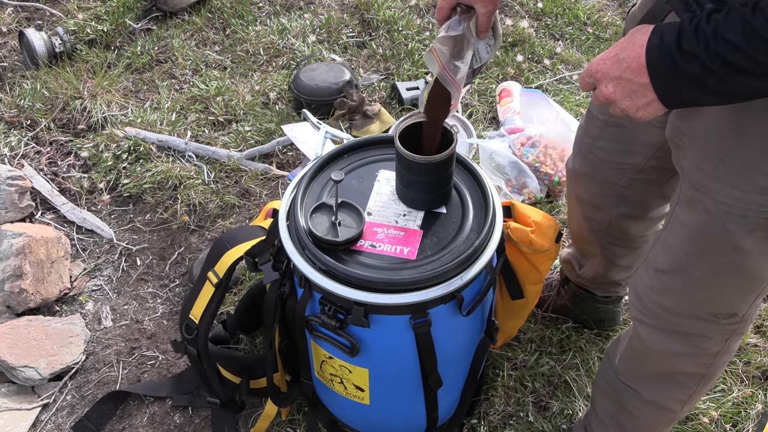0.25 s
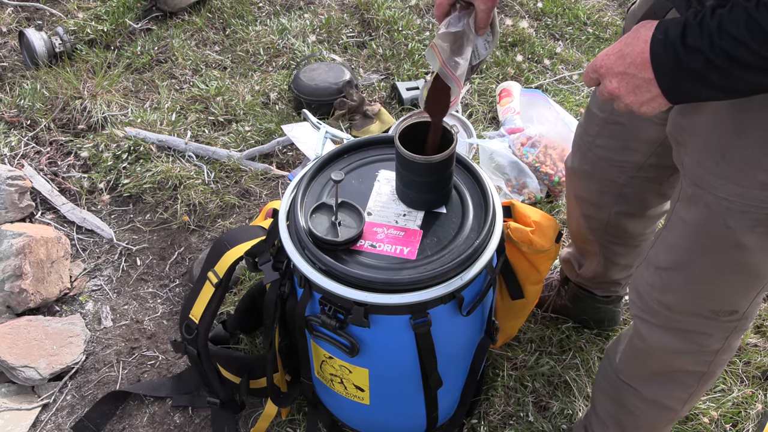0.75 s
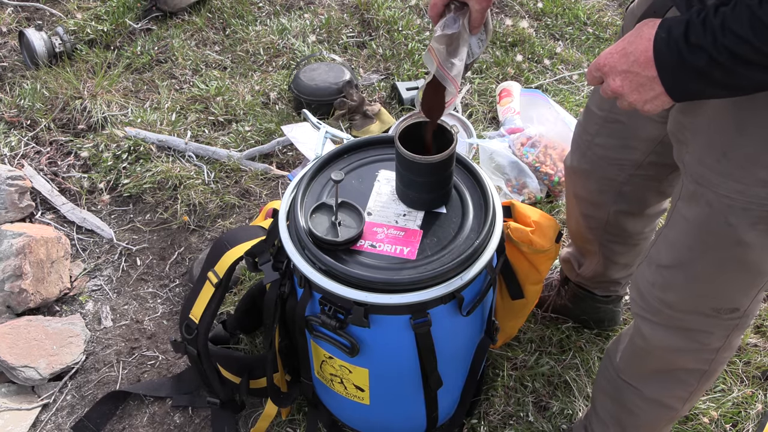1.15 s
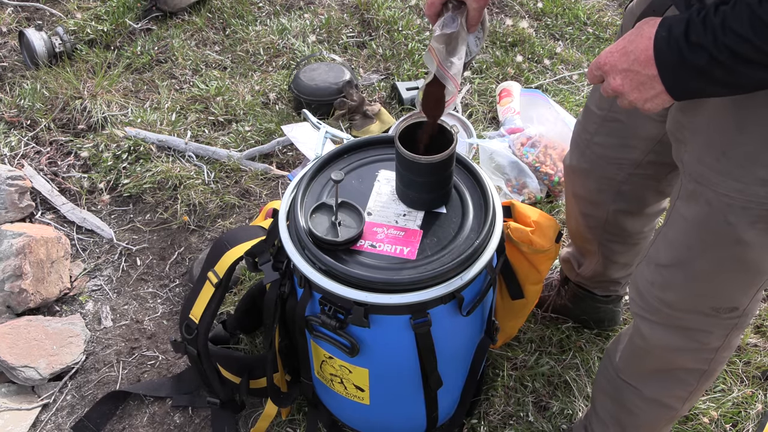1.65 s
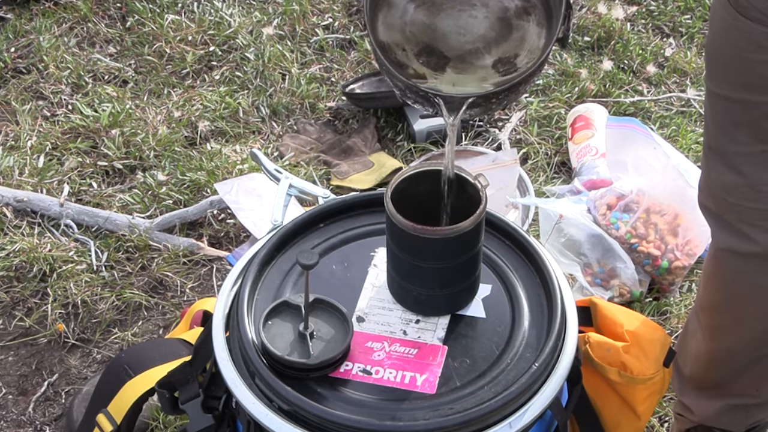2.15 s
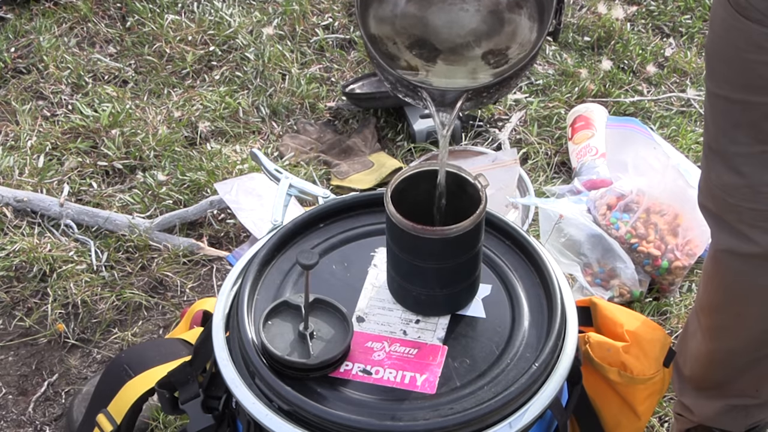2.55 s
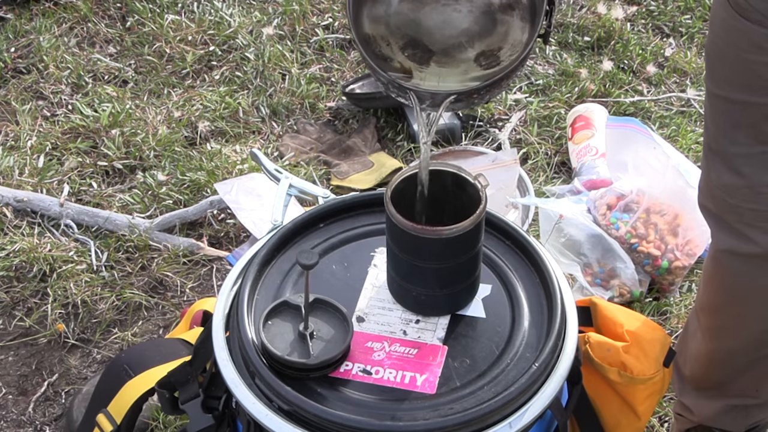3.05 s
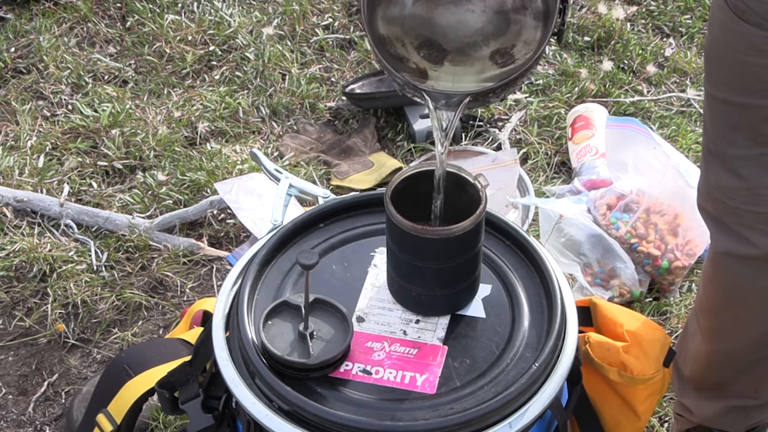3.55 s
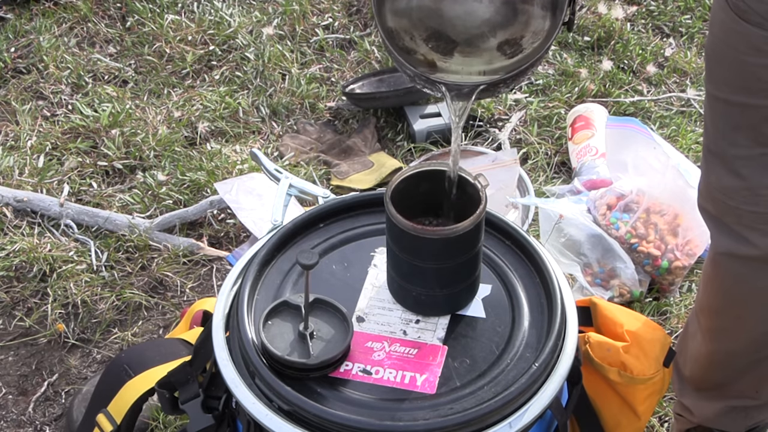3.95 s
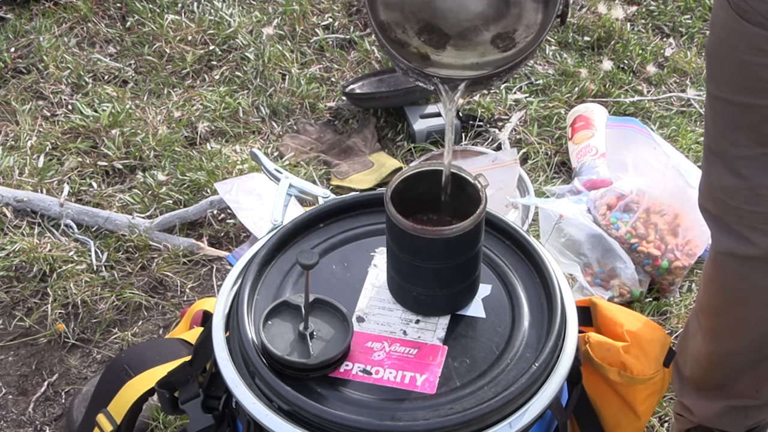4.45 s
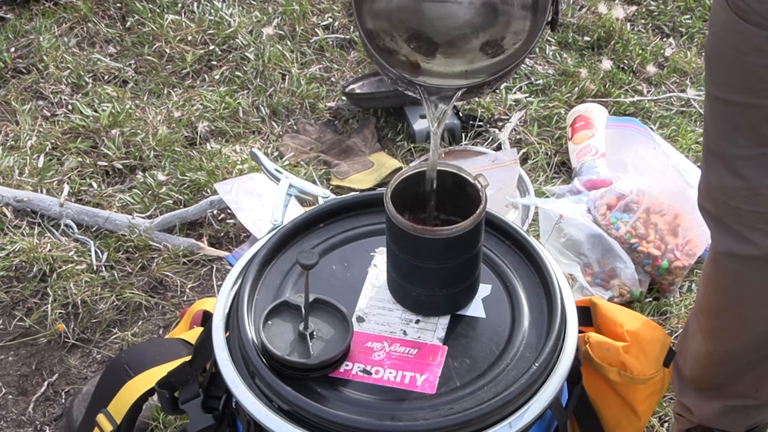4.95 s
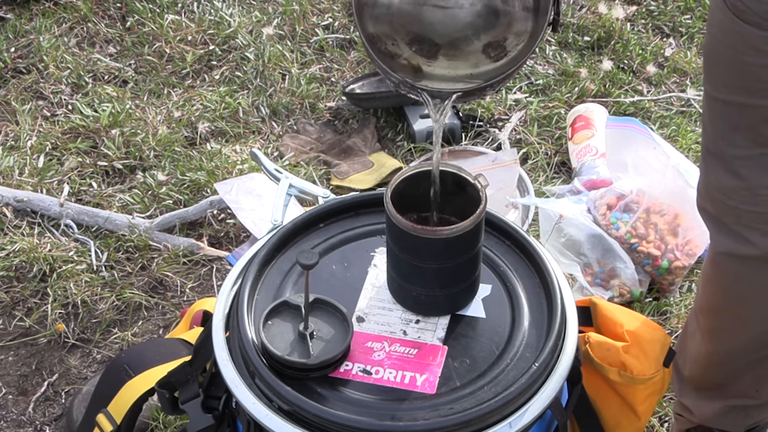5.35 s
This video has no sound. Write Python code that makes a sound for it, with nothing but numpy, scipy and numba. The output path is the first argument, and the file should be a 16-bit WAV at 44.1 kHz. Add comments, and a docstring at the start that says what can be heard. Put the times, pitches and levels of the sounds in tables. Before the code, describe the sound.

Tiny bag and spoon ticks over a soft river rush and low gusts; then sharp, dry metallic knocks, a close pair and a single one, with a weaker knock just before the pour. Hot water then streams into a tall mug, crisp, fizzy and uneven, with small slaps ringing the wall and air inside. The splashes surge strongly late on. Close two-channel microphone in open air, leaning left, with little reverberation.

```python
"""A stream of hot water pours into a tall metal mug: bursts of noise and tiny bubbles make its spatter and spray,
while the same water rings the mug's wall and the air inside. Just before it lands, four knocks on the mug
sound as short pushes, rattles and ringing modes; faint ticks of handling lie around them. A river rushes
further off as noise in many bands, and wind rumbles low on a two-port microphone whose right port is thin
in the bass and of opposite sign."""
import sys
import numpy as np
from scipy import signal
from scipy.fft import rfft, irfft
from scipy.io import wavfile
from scipy.ndimage import uniform_filter1d
from numba import njit

SR = 44100
rng = np.random.default_rng(int(sys.argv[2]) if len(sys.argv) > 2 else 0)


def put_to_file(sound):
    """Save the sound as 16-bit audio at rate SR, in the file named by the first command-line argument."""
    columns = np.atleast_2d(sound).T  # one column per channel
    safe = np.clip(columns, -1, 1)
    whole_steps = np.round(safe * 32767)
    wavfile.write(sys.argv[1], SR, whole_steps.astype(np.int16))


N = 246959  # length in samples
# Levels in the tables apply before the sound is shared between left and right and enters the microphone.


def undb(db):
    """Turn decibels into a plain gain."""
    return 10 ** (np.asarray(db) / 20)


def unit(x):
    """Scale a sound to rms 1."""
    return x / np.sqrt(np.mean(x ** 2))


def peak(x, db):
    """Scale a sound so that its highest peak is at this level."""
    return x * undb(db) / np.max(np.abs(x))


def curves(table, before_db=None):
    """Draw straight lines between a table's rows, one curve per column after the time."""
    s, *columns = np.transpose(table)
    return [np.interp(np.arange(N) / SR, s, c, left=before_db) for c in columns]


@njit
def sweep(x, hz, width):
    """State-variable band-pass with moving centre and width, gain 1 at the centre."""
    y, low_state, band_state = np.empty(len(x)), 0., 0.
    for i in range(len(x)):
        g, k = np.tan(np.pi * hz[i] / SR), width[i] / hz[i]
        v = (band_state + g * (x[i] - low_state)) / (1 + g * (g + k))
        band_state = 2 * v - band_state
        low_state += 2 * g * v
        y[i] = k * v
    return y


def band(x, hz, width_hz):
    """Keep the sound around one frequency, like a resonance that may move."""
    if np.ndim(hz):
        return sweep(x + 1e-18, hz, np.abs(width_hz + 0 * hz) + 1)
    # a centre that stands still needs only a plain two-pole filter
    hz = np.clip(hz, 20, .45 * SR)
    g = np.tan(np.pi * hz / SR)
    kg = g * abs(width_hz) / hz
    return signal.lfilter([kg, 0, -kg], [1 + kg + g * g, 2 * (g * g - 1), 1 - kg + g * g], x)


def twice(x, hz, width_hz):
    """The same band-pass run two times, for steeper sides."""
    return band(band(x, hz, width_hz), hz, width_hz)


def walk(rate):
    """A random level that takes a new value `rate` times a second, smoothed twice; spread near 1."""
    k = int(SR / rate)
    steps = np.repeat(rng.standard_normal(N // k + 1), k)
    return 1.43 * uniform_filter1d(uniform_filter1d(steps, k), k)[:N]


def crackle(rate, spread_db, smear_s):
    """Noise in short dying bursts of very uneven size; rms 1."""
    sizes = undb(spread_db * rng.exponential(size=N).clip(0, 4))
    hits = (rng.random(N) < rate / SR) * sizes
    tail = np.exp(-1 / (smear_s * SR))
    return unit(signal.lfilter([1], [1, -tail], hits) * rng.standard_normal(N))


def burst(t60, rise_s, size):
    """A noise that swells quickly and dies away by 60 dB in t60 seconds."""
    t = np.arange(size) / SR
    decay = np.exp(-np.log(1000) * t / max(t60, .001))
    return rng.standard_normal(size) * decay * np.minimum(t / max(rise_s, 1e-5), 1) ** 2


@njit
def ring_all(start, hz, cycles, size, glide, n):
    """Add up bubbles, each a dying sine whose pitch rises as it fades."""
    out = np.zeros(n)
    for k in range(len(start)):
        life = int(cycles[k] * SR / hz[k])
        phase = 0.
        for i in range(min(5 * life, n - start[k])):
            phase += 2 * np.pi * hz[k] * (1 + glide * i / life) / SR
            out[start[k] + i] += size[k] * np.exp(-i / life) * np.sin(phase)
    return out


def droplets(count, hz, octaves, cycles, spread_db, glide, clump):
    """Tiny bubbles in clumps, each ringing at its own pitch; rms 1."""
    place, loud = rng.random((count, 2)).T
    pitch, long = rng.standard_normal((count, 2)).T
    start = (place * N).astype(np.int64)
    size = undb(-spread_db * np.log(loud.clip(.02, 1)) + clump * walk(60)[start])
    bubble_hz = (hz * 2 ** (octaves * pitch)).clip(300, 14000)
    return unit(ring_all(start, bubble_hz, cycles * 2 ** (.5 * long), size, glide, N))


def ports(x, pan_db, lag_ms):
    """Share a sound between two ports: left minus right level, and how late the left one hears it."""
    turn = np.exp(-1j * np.pi * np.fft.rfftfreq(len(x), 1 / SR) * lag_ms / 1000)
    f = rfft(x)
    left = irfft(f * turn, len(x)) * undb(pan_db / 2)
    right = irfft(f / turn, len(x)) * undb(-pan_db / 2)
    return np.array([left, right])


def add(out, s, x):
    """Mix a short sound in at time s."""
    i = int(s * SR)
    n = min(x.shape[-1], N - i)
    out[..., i:i + n] += x[..., :n]


# Tone colour of the river. Each row: frequency in Hz, relative level in dB per Hz.
RIVER_COLOUR = [(59, -30), (100, 0), (143, -23), (206, -6.5), (283, -10.5), (535, 1.5), (608, 0.5),
                (1100, -2), (1870, -6), (2080, -7.5), (2580, -12.5), (3150, -16.5), (3700, -23),
                (5770, -25), (13200, -33.5), (16000, -34)]
RIVER_DB = -45  # average level before its slow swell


def river():
    """Bands of rushing noise flicker separately; the ports hear more alike in the bass than in the treble."""
    out, (hz_at, db_at) = 0, np.transpose(RIVER_COLOUR)
    for hz in 100 * 2 ** np.arange(0, 7.4, 1 / 3):  # third-octave steps
        mid, side = (twice(rng.standard_normal(N), hz, hz / 3) for _ in range(2))
        db = np.interp(np.log(hz), np.log(hz_at), db_at) + 1.0 * walk(7.5)
        apart = np.clip(hz / 3500, .4, 1)
        out = out + undb(db) * (mid + apart * side * np.array([[1], [-1]]))
    pan_db = np.array([[-1.5], [1.5]])
    return unit(out) * undb(RIVER_DB + 0.84 * walk(1.26) + pan_db)


# Gusts of wind. Each row: time in seconds, rumble level in dB before a small random wavering.
GUSTS = [(0.0, -57.5), (0.5, -46), (0.6, -49), (0.95, -48.5), (1.4, -60), (1.52, -54.5), (1.65, -57.5),
         (2.9, -50.5), (3.0, -58), (3.8, -57), (4.2, -55.5), (4.33, -59), (4.66, -48.5), (4.78, -57),
         (5.13, -54), (5.6, -63)]
FLUTTER_DB = -62.5  # higher flutter, around which its level wavers


def wind():
    """Gusts press on both ports, mostly shared, as a low rumble and a slightly higher flutter."""
    rumble_db, = curves(GUSTS)
    gust = rng.standard_normal(N) + .5 * rng.standard_normal((2, N))
    rumble = np.array([unit(band(band(g, 63, 67), 69, 99)) for g in gust])
    flutter = np.array([unit(band(band(g, 139.5, 50), 139, 82)) for g in gust])
    flutter_db = FLUTTER_DB + 1.14 * walk(3.05)
    return undb(1.2 * walk(6.2)) * (undb(rumble_db) * rumble + undb(flutter_db) * flutter)


# Small ticks of handling. Each row: start in seconds, peak in dB, centre in Hz,
# level of the lower body in dB relative to that peak.
HANDLING = [(0.094, -42.5, 2040, -5), (0.3203, -43, 2050, -6), (0.415, -34, 4700, -25),
            (0.5121, -29.5, 2920, -35), (0.5464, -30.5, 2650, -2), (1.5005, -39.5, 1940, -20),
            (1.562, -44, 2940, 6), (1.6907, -49, 1910, 16.5), (1.741, -47.5, 2140, 8.5),
            (1.8716, -41.5, 2080, 13.5), (1.92, -38.5, 2140, -3)]


def ticks():
    """Bag and spoon crackle faintly: a short noise in a bright band and a lower one."""
    out = np.zeros(N)
    for s, db, hz, body_db in HANDLING:
        tick = burst(0.016, 0.00017, size=1024)
        bright = peak(band(tick, hz, 0.28 * hz), db)
        body = peak(band(tick, 820, 600), db + body_db)
        add(out, s, bright + body)
    return ports(out, 7.0, .1)


# Knocks on the mug. Each row: start in seconds, peak of the main layer in dB, thud in dB relative to it,
# treble in dB relative to it, rattle's 60 dB decay in seconds, left minus right level in dB,
# rattle in dB relative to the push, contact time scale in milliseconds.
KNOCK_HITS = [(0.9527, -2.5, -2.5, -51, 0.027, 2, -5, 0.042), (0.9844, -3, -5, -12, 0.028, 5.5, -13, 0.063),
              (1.2698, -2.5, -12, -4, 0.013, -5, 0.5, 0.04),
              (1.8486, -16.5, -1.3, -42, 0.014, 0.5, 1, 0.14)]
# Echoes from the ground and the packs. Each row: delay in seconds, level in dB.
ECHOES = [(.0065, -14), (0.0151, -23), (0.033, -28)]
# Ringing modes of the lid. Each row: frequency in Hz, decay setting in seconds (longer makes a narrower band),
# level in dB before the modes are mixed with the thud and crack.
LID_MODES = [(240, 0.021, 8.5), (677, 0.032, 3.5), (1100, 0.008, 7), (1560, 0.013, -7.5), (2060, 0.02, -2),
             (4220, 0.014, -0.5), (5900, 0.0025, 8.5)]
KNOCK_LAG_MS = 0.11  # the left port hears the direct knocks this late


def knocks():
    """A hard push on the lid, a rattle of metal, the lid's short modes, then echoes from close by."""
    out, t = np.zeros((2, N)), np.arange(8192) / SR
    for s, db, thud_db, treble_db, t60, pan_db, rattle_db, contact_ms in KNOCK_HITS:
        push = -np.exp(-((t - .0003) * 1000 / contact_ms) ** 2)
        rattle = burst(t60, 0.00044, size=len(t))
        rattle = rattle + undb(-30.5) * burst(9.1 * t60, 0.00077, size=len(t))  # faint long tail
        metal = peak(band(twice(rattle, 3860, 5400), 3740, 5700), rattle_db)
        crack = peak(band(push, 3800, 9800), 0) + metal
        struck = push + 0.36 * rattle
        modes = [undb(g) * peak(band(struck, f, 3.3 / decay), 0) for f, decay, g in LID_MODES]
        # the three lowest modes join the thud, the others the crack
        thud = peak(band(push, 310, 1500), 0) + .5 * sum(modes[:3])
        treble = twice(push + 1.0 * rattle, 8070, 8200)
        hit = peak(thud, db + thud_db) + peak(crack + 0.26 * sum(modes[3:]), db)
        hit = hit + peak(treble, db + treble_db)
        add(out, s, ports(hit, pan_db, KNOCK_LAG_MS))
        # the metal's finest rattle reaches each port by its own paths
        jingle = [twice(burst(t60, 0.00059, size=len(t)), 8700, 6300) for _ in range(2)]
        add(out, s, peak(np.array(jingle), db + 1.15 * treble_db - 0.5))
        for (delay, g), side in zip(ECHOES, (-1, 1, -1)):
            echo = ports(band(hit, 3500, 14000), 1.5, .1 + 0.069 * side)
            add(out, s + delay, undb(g) * echo)
    return out


# Strength of the stream. Each row: time in seconds, spray level in dB.
STREAM = [(1.6, -63), (2.0, -59), (2.2, -59), (2.45, -61), (2.64, -54), (2.8, -58), (3.3, -63),
          (3.6, -61.5), (3.89, -67.5), (4.38, -58), (4.72, -60.5), (4.8, -52), (5.0, -54.5), (5.1, -64),
          (5.6, -63)]
LANDING_S = 1.95  # from here on lesser spatters may fall and the mug murmurs


def spray_level():
    """The spray's level in dB at every sample, silent before the stream."""
    return curves(STREAM, before_db=-120)[0]


# Loud spatters of the stream. Each row: start in seconds, peak of the body in dB, centre in Hz,
# fizz in dB relative to that peak.
LOUD_SPATTERS = [(2.0242, -37, 6010, -22), (2.0348, -35, 3350, -27), (2.0547, -36, 3330, -25),
                 (2.0734, -32, 3400, -29), (2.093, -34, 3380, -15), (2.1141, -23.5, 5420, -28),
                 (2.1355, -37, 5350, -18), (2.166, -39, 5210, -24), (2.1994, -40, 3100, -28),
                 (2.207, -37, 3050, -29), (2.2223, -35, 3080, -29), (2.2284, -33.5, 2960, -18),
                 (2.2415, -25, 6360, -11), (2.2812, -30, 6210, -25), (2.3006, -37.5, 4900, -25),
                 (2.3555, -31.5, 7110, -21), (2.376, -34.5, 6140, -19), (2.3894, -36, 7160, -16),
                 (2.4244, -36.5, 7040, -22), (2.4878, -38.5, 5200, -21), (2.539, -29.5, 5200, -29),
                 (2.5584, -39, 5300, -24), (2.5883, -35, 5490, -18), (2.602, -38, 3070, -23),
                 (2.6025, -31, 3350, -15), (2.6314, -38, 3230, -18), (2.6498, -39, 3210, -23),
                 (2.6579, -37, 3170, -22), (2.6798, -34, 3260, -25), (2.691, -36, 5210, -18),
                 (2.712, -32, 4740, -28), (2.7614, -37, 3050, -26), (2.7764, -35.5, 3330, -15),
                 (2.8593, -34, 4350, -12), (2.9378, -40, 3040, -18), (2.967, -35, 3390, -22),
                 (2.9814, -39, 3220, -21), (3.0736, -37.5, 3350, -20), (3.1232, -30.5, 3380, -26),
                 (3.1802, -34, 5990, -14), (3.224, -39, 3360, -19), (3.247, -44, 3370, -19),
                 (3.262, -39, 5020, -22), (3.28, -38.5, 3250, -21), (3.4183, -37, 3270, -24),
                 (3.46, -29.5, 6930, -20), (3.5458, -39.5, 3600, -15), (3.573, -34, 6150, -20),
                 (3.5824, -33, 6940, -25), (3.621, -33, 4280, -22), (3.6476, -36, 3450, -18),
                 (3.8828, -40, 5720, -26), (3.9906, -36.5, 7920, -25), (4.0138, -46, 3110, -19),
                 (4.063, -40.5, 4710, -15), (4.1077, -26.5, 4860, -23), (4.1177, -34, 4690, -20),
                 (4.1618, -35.5, 5080, -26), (4.2235, -40.5, 2940, -19), (4.3054, -41, 4580, -9),
                 (4.338, -23.5, 3320, -26), (4.377, -39, 3170, -8), (4.3939, -27, 3270, -23),
                 (4.404, -34, 3140, -17), (4.4995, -39, 5260, -19), (4.5408, -32, 3240, -8),
                 (4.59, -18, 5200, -15), (4.5984, -36, 3000, -14), (4.6384, -30.5, 3300, -36),
                 (4.6887, -41, 2900, -19), (4.7276, -34, 5200, 1), (4.76, -25, 3340, -21),
                 (4.7843, -31, 3120, -14), (4.7925, -28, 2980, 7), (4.8239, -24.5, 5630, -28),
                 (4.835, -29, 6130, -20), (4.8414, -24, 5810, -29), (4.8589, -15.5, 4400, -39),
                 (4.8782, -27, 4600, -29), (4.8842, -30, 2900, -24), (4.9028, -29.5, 5300, -18),
                 (4.9329, -22, 3460, -28), (4.9504, -26.5, 5350, -23), (4.9653, -26.5, 5390, -18),
                 (4.9724, -32, 4630, -16), (4.9957, -26.5, 4100, -3), (5.0017, -28, 3140, -17),
                 (5.0454, -32, 4100, -28), (5.0624, -36, 3000, -18), (5.094, -39.5, 6000, -4),
                 (5.1157, -35, 7520, 7), (5.154, -40, 2910, 8), (5.1955, -38.5, 3300, -15),
                 (5.2835, -28, 5950, -29), (5.3637, -33, 6570, -27), (5.425, -44, 3020, -12),
                 (5.507, -33, 5930, -24), (5.5356, -41, 3190, -12), (5.5744, -36.5, 7410, -18)]
SPATTER_T60_S, EDGE_DB = 0.0099, -2  # middle decay; broad bright edge relative to the body
THROWN_DB, THROWN_S = -17, 0.0047  # spray thrown up, relative to the body, and its fading time
# lesser spatters: least level relative to the spray, its spread, middle pitch and fizz
SMALL_DB, SMALL_SPREAD_DB, SMALL_HZ, SMALL_OCTAVES, SMALL_FIZZ_DB = 16.5, 2, 4900, 0.83, -12


def lesser_spatters(spray_db, count):
    """Choose random small spatters that follow the strength of the spray."""
    when, size, pitch, top = rng.random((count, 4)).T
    when = LANDING_S + when * ((N - 1) / SR - LANDING_S)
    db = spray_db[(when * SR).astype(int)] + SMALL_DB - SMALL_SPREAD_DB * np.log(size.clip(.05, 1))
    hz = SMALL_HZ * 2 ** (SMALL_OCTAVES * (2 * pitch - 1))
    return zip(when, db, hz, SMALL_FIZZ_DB + 16 * (top - .5))


def spatters(spray_db):
    """Water strikes in short bursts and throws up spray; returns the bursts and the gain of that spray."""
    splash, thrown = np.zeros((2, N))
    t = np.arange(2048) / SR
    for s, db, hz, fizz_db in [*LOUD_SPATTERS, *lesser_spatters(spray_db, count=95)]:
        drop = burst(SPATTER_T60_S * 2 ** rng.uniform(-1.0, 0.52), 0.0022, size=768)
        drop[60] += 2.2  # the impact itself is one sharp tick
        # big low bubbles ring a clearer pitch than small high ones
        body = peak(twice(drop, hz, hz * hz / 6500), db)
        edge = peak(twice(drop, 6670, 5000), db + EDGE_DB)
        fizz = peak(twice(drop, 8400, 7500), db + fizz_db)
        add(splash, s, body + edge + fizz)
        add(thrown, s, undb(db + THROWN_DB) * np.exp(-t / THROWN_S))
    return splash, thrown


# A high mode of the mug that the spray rings: frequency in Hz, width in Hz,
# level in dB at landing, around which it wavers before fading.
HIGH_MODE = (5380, 220, 1.65)
HIGH_MODE_FADE_DB_PER_S = 3.5  # the rising water damps it
FIZZ_DB = -13  # relative to the spray


def spray():
    """Fine bubbles ring a high mode of the mug, under a very high crackling fizz."""
    hz, width_hz, level_db = HIGH_MODE
    bubbles = droplets(count=14000, hz=5930, octaves=0.37, cycles=1.6, spread_db=3.5, glide=0.035, clump=3.7)
    fizz = unit(twice(crackle(900, 1.9, 0.005), 14200, 5300))
    fade_db = HIGH_MODE_FADE_DB_PER_S * (np.arange(N) / SR - LANDING_S)
    sizzle = undb(level_db + 2.3 * walk(5.75) - fade_db) * band(bubbles, hz, width_hz)
    return bubbles + sizzle + undb(FIZZ_DB) * fizz


def scatter():
    """Spray that reaches each port by its own path: separate bubbles on left and right."""
    return np.array([droplets(count=8000, hz=5240, octaves=0.54, cycles=1.7, spread_db=5.5,
                              glide=0.024, clump=1.8) for _ in range(2)])


def slap_ring(slap, hz, width_hz):
    """A slap sets a resonance ringing; a slap of 1 rings at a peak near 1."""
    return band(slap, hz, width_hz) * SR / (2 * np.pi * width_hz)


# Resonances as the mug fills. Each row: time in seconds, wall frequency in Hz,
# air column frequency in Hz, air column width in Hz.
MUG_PITCH = [(1.95, 287, 695, 53.6), (2.6, 284, 689, 45), (3.4, 264.5, 697, 50), (4.2, 253.6, 924, 204),
             (4.9, 269.5, 970, 157), (5.6, 243, 940, 150)]
# How hard the stream drives the mug. Each row: time in seconds, wall hum in dB, air column in dB.
MUG_DRIVE = [(1.95, -69, -54), (2.35, -46, -55.5), (2.65, -56.5, -48.5), (3.5, -55, -56),
             (3.95, -65, -57.5), (4.5, -58, -55), (5.05, -58.5, -54.5), (5.25, -75, -55), (5.6, -58, -54)]
# Lumps of water that slap the mug. Each row: start in seconds, wall peak in dB,
# air column peak in dB, broad smack peak in dB.
SLAPS = [(2.04, -56, -39, -44), (2.055, -55, -34.5, -55), (2.076, -37, -52, -44), (2.115, -42, -49, -28),
         (2.145, -36.5, -39, -32), (2.227, -54, -53, -27), (2.24, -41, -40, -27), (2.306, -37, -37, -41),
         (2.359, -33.5, -34.5, -33), (2.377, -38, -35, -32), (2.428, -37, -54, -44), (2.539, -53, -37, -41),
         (2.583, -36, -39, -41), (2.608, -37, -32, -30), (2.63, -55, -43, -30), (2.698, -39, -50, -28),
         (2.752, -38, -33, -50), (2.961, -40, -35.5, -47), (3.183, -40, -39, -40), (3.229, -38, -52, -57),
         (4.013, -40, -35, -40), (4.108, -39, -54, -51), (4.191, -38, -36, -39), (4.394, -30.5, -28, -30),
         (4.5, -34.5, -31, -48), (4.59, -30.5, -19.5, -33), (4.696, -44, -32.5, -46),
         (4.849, -50, -30.5, -48), (4.924, -38.5, -29, -39), (5.048, -44, -29, -47), (5.164, -35, -39, -40),
         (5.492, -37.5, -32.5, -52)]
SLAP_WIDTH_HZ, AIR_NARROWING = 40, .66  # slapped wall; slapped air column as a share of its width
GURGLE_DB = 1  # big bubbles relative to the air column's murmur


def mug():
    """Lumps of water slap the wall and the air column, which murmur between slaps; big bubbles gurgle."""
    wall_db, air_db = curves(MUG_DRIVE, before_db=-120)
    wall_hz, air_hz, air_width_hz = curves(MUG_PITCH)
    wall_slap, air_slap, smack = np.zeros((3, N))
    for s, db, column_db, smack_db in SLAPS:
        add(wall_slap, s, -undb(db) * np.hanning(32) / np.hanning(32).sum())
        add(air_slap, s, -undb(column_db) * np.hanning(16) / np.hanning(16).sum())
        add(smack, s, peak(twice(burst(0.014, 0.0018, size=1024), 720, 1450), smack_db))
    # between the slaps the stream still lands unevenly and keeps the resonances murmuring
    lumps = crackle(300, 1.5, .004)
    wall = undb(wall_db) * unit(band(lumps, wall_hz, 13))
    wall = wall + slap_ring(wall_slap, wall_hz, SLAP_WIDTH_HZ)
    air = undb(air_db) * unit(band(lumps, air_hz, air_width_hz))
    air = air + slap_ring(air_slap, air_hz, AIR_NARROWING * air_width_hz)
    bubbles = droplets(count=2500, hz=816, octaves=0.613, cycles=3.05, spread_db=2.5, glide=.05, clump=2.4)
    return wall + air + smack + undb(air_db + GURGLE_DB) * bubbles


# Air ringing across the nearly empty mug. Each row: frequency in Hz, filter width in Hz.
ACROSS_MODES = [(1980, 310), (3200, 420)]
# Surges of patter. Each row: time of the height in seconds, lower mode in dB, upper mode in dB.
SURGES = [(2.06, -53, -49), (2.205, -56, -51), (2.235, -43.5, -60), (2.3, -49, -71), (2.386, -48, -60),
          (2.62, -54, -52), (2.69, -38.5, -52), (2.765, -58, -57)]
SURGE_RISE_S, SURGE_FALL_S = 0.024, .03


def cross_air():
    """Surges of patter excite the air from side to side of the mug."""
    t, patter, out = np.arange(N) / SR, crackle(420, 0.91, 0.0029), 0
    tones = [unit(twice(patter, hz, width_hz)) for hz, width_hz in ACROSS_MODES]
    for s, *levels in SURGES:
        surge = np.exp(np.minimum((t - s) / SURGE_RISE_S, (s - t) / SURGE_FALL_S))
        out = out + surge * sum(undb(db) * tone for tone, db in zip(tones, levels))
    return out


SCATTER_DB = -11  # relative to the spray


def pour():
    """Spatters and a fine spray; the same stream shakes the wall and the air in the mug."""
    spray_db = spray_level()
    splash, thrown = spatters(spray_db)
    spray_gain = undb(spray_db) + thrown  # each spatter briefly adds to the spray
    splash = splash + spray_gain * spray()
    scattered = spray_gain * undb(SCATTER_DB) * scatter()
    return ports(splash + cross_air(), 8.08, -0.11) + ports(mug(), 7.8, -0.15) + scattered


def scene():
    """All sources together at the two ports."""
    return river() + wind() + ticks() + knocks() + pour()


# Cavity in front of the right port: frequency in Hz, width in Hz, boost in dB.
RIGHT_CAVITY = (2380, 750, 8.22)
RIGHT_BASS_HZ, RIGHT_DB = 343, -6.5  # bass cut and level of the right port
RIGHT_LEAK_DB = -14.5  # sound that bypasses the bass cut
MIC_ROLL_HZ, TOP_HZ = 14300, 16500  # gentle treble roll-off; steep upper limit


def record(dry):
    """The right port loses bass, rings a little and is of opposite sign; the top rolls off and peaks clip."""
    hz, width_hz, db = RIGHT_CAVITY
    bass_cut = signal.butter(1, RIGHT_BASS_HZ, "high", fs=SR)
    right = signal.lfilter(*bass_cut, dry[1]) + undb(RIGHT_LEAK_DB) * dry[1]
    right = -undb(RIGHT_DB) * (right + (undb(db) - 1) * band(right, hz, width_hz))
    both = signal.lfilter(*signal.butter(2, MIC_ROLL_HZ, fs=SR), np.array([dry[0], right]))
    steep = signal.ellip(12, .2, 100, TOP_HZ, fs=SR, output="sos")
    return signal.sosfilt(steep, np.clip(both, -1, 1))


dry = scene()
out = record(dry)
put_to_file(out)
```